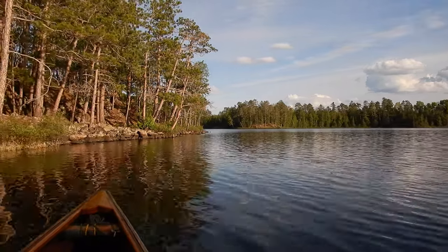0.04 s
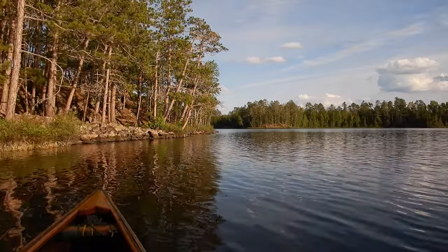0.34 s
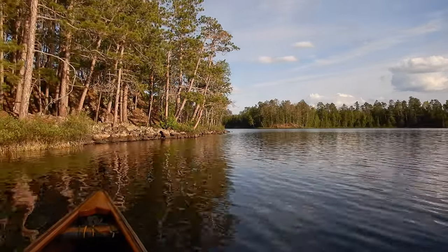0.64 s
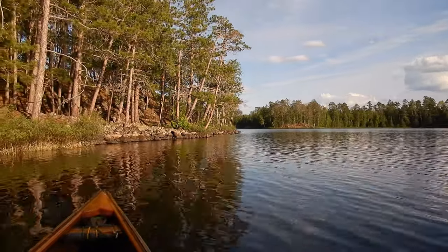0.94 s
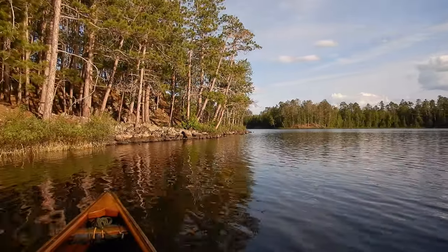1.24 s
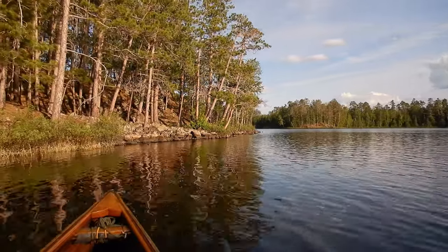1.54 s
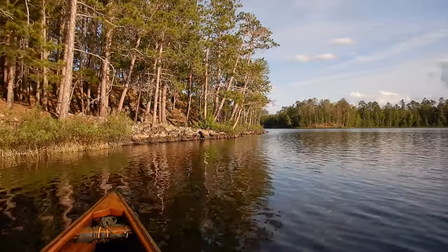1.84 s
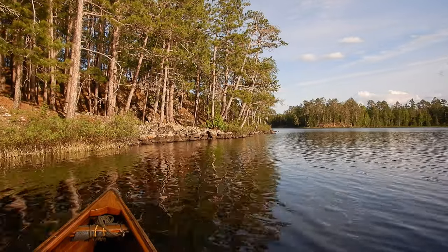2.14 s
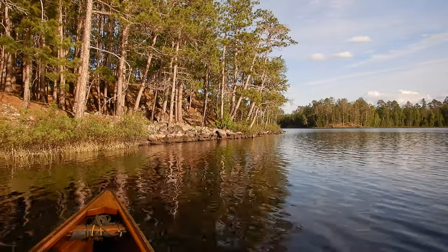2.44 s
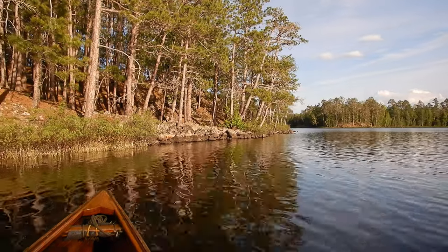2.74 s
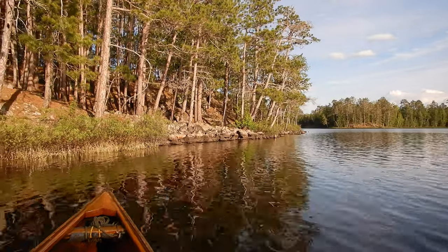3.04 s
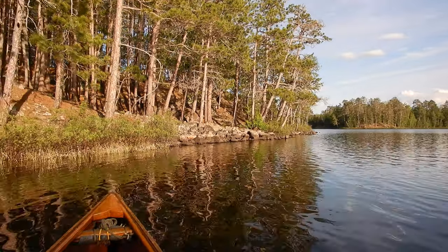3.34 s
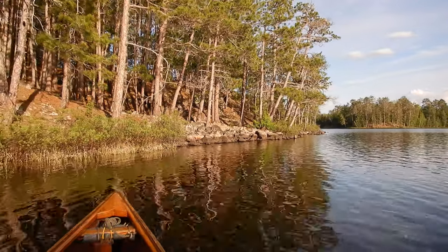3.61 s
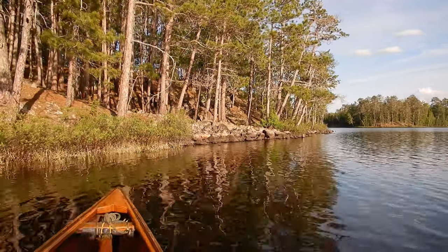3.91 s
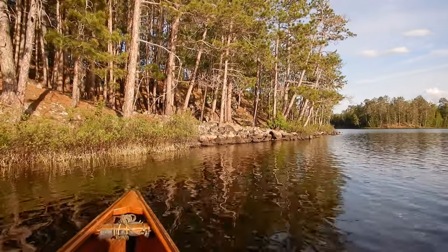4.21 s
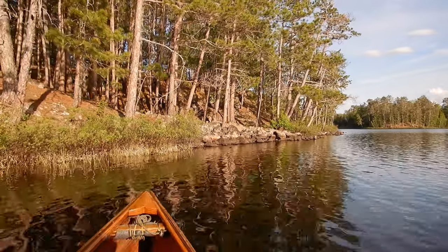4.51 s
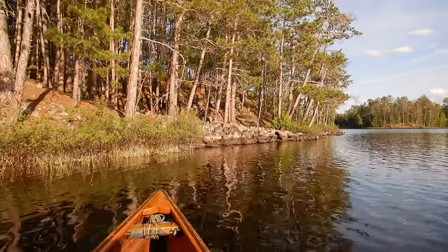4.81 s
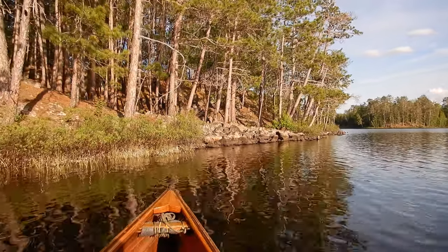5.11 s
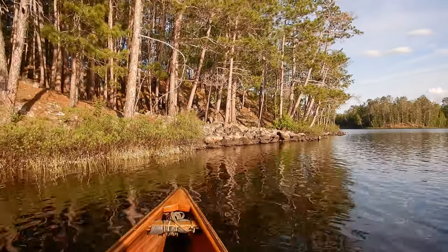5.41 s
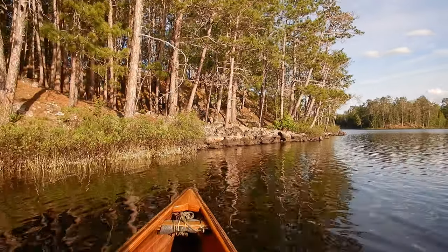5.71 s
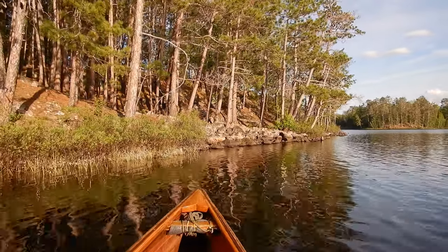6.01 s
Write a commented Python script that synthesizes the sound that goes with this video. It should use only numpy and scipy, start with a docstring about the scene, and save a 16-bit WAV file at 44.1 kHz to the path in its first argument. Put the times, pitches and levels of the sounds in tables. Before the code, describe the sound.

Gentle paddling on a quiet lake: bright plops, pattering drops and a low rubbing knock against the canoe, over a soft breeze.

```python
"""Bright plops and a patter of drops: a paddle dips beside a canoe gliding over a calm lake.
Each plop is a pocket of air ringing under the surface; drops tick and spray hisses off the blade.
On the pull the shaft sticks and slips along the hull, a dull judder that booms in the boat,
and eddies of tiny bubbles gurgle behind. A far bird whistles, light puffs buffet the microphone
and air moves softly in the shore pines."""
import sys
import numpy as np
from scipy import signal
from scipy.fft import rfft, irfft, next_fast_len
from scipy.io import wavfile
from scipy.ndimage import uniform_filter1d, map_coordinates

SR = 44100
rng = np.random.default_rng(int(sys.argv[2]) if len(sys.argv) > 2 else 0)


def generate_wav(signal):
    """Clip the signal to [-1, 1] and save it as 16-bit WAV at the path in sys.argv[1]."""
    frames = np.transpose(np.atleast_2d(signal))
    scaled = np.clip(frames, -1, 1) * 32767
    pcm = np.round(scaled).astype(np.int16)
    wavfile.write(sys.argv[1], SR, pcm)


N = 276066

# Levels in the tables are set ahead of each layer's own gain.
# drops and wavelets that smack the surface: start_s, pitch_hz, level_db, decay_cycles
SMACKS = [(0.0267, 1800, -28.5, 1.8), (.27, 2250, -31.5, 2.2), (1.0818, 2570, -23, 1.1),
          (1.1098, 960, -18, 0.38), (1.129, 1800, -34, 1), (1.151, 3080, -39, 3.6), (1.605, 1480, -39, 2.1),
          (1.988, 2000, -32.5, 1.6), (2.093, 1600, -19, 1.9), (2.096, 2850, -16.5, 3),
          (2.102, 1820, -16, 1.4), (2.11, 1910, -18, 1.3), (2.113, 1226, -14.5, 0.56),
          (2.151, 3060, -31, 2.4), (2.169, 1204, -22, 0.9), (2.1748, 2500, -10, 1.2),
          (3.869, 697, -34, 1.5), (3.885, 654, -26.5, 3.2), (3.9483, 728, -23, 1.9),
          (5.3959, 1890, -33.5, 1.3), (5.6677, 1610, -30.5, 1.8)]
# air pockets ringing under water: start_s, pitch_hz, level_db, swell_s, decay_s, glide (+ up, - down)
BUBBLES = [(.027, 565, -41, 0.0022, 0.0072, -1), (0.587, 1365, -44.5, 0.01, 0.0056, -1.5),
           (1.0814, 1560, -25.5, 0.00067, 0.003, 22.5), (1.0883, 915, -17.5, 0.0044, 0.0038, 6),
           (1.109, 415, -30.5, 0.0019, 0.008, -5.5), (2.0118, 1156, -19.5, 0.0018, 0.0011, 2.5),
           (2.017, 1650, -29, 0.0014, .004, -1.5), (2.029, 3050, -42.5, .003, .002, 3),
           (2.102, 934, -29.5, 0.0016, 0.0057, 9.5), (2.115, 610, -27, 0.0027, 0.0047, 4),
           (2.157, 1510, -26.5, 0.0037, 0.0019, 3), (2.175, 2190, -28, 0.0017, 0.0044, 6),
           (2.177, 996, -34, .002, 0.0043, -1), (2.183, 543, -34.5, 0.0033, 0.01, 13.5),
           (3.487, 266, -35.5, 0.0025, 0.014, 1.5), (3.63, 860, -41.5, 0.003, 0.0051, 10),
           (3.767, 1610, -38.5, 0.0041, 0.0039, 4), (3.865, 398, -30.5, 0.0026, 0.0095, 0),
           (3.879, 314, -25.5, 0.0034, .009, 1.5), (3.952, 805, -36.5, 0.0022, 0.0054, 6),
           (3.951, 414, -30.5, .002, 0.0054, -3), (4.388, 1313, -38.5, 0.0041, 0.0096, 7),
           (5.049, 662, -41, 0.002, 0.0104, 4), (5.513, 3060, -39.5, 0.0013, 0.004, -2),
           (5.541, 2657, -37, 0.009, 0.0039, -1.5), (5.576, 1430, -37.5, 0.0037, .003, 7),
           (5.585, 4240, -44.5, 0.0057, 0.0034, 2), (5.593, 1500, -37, 0.0013, 0.0024, 15),
           (5.604, 1175, -35.5, 0.0017, 0.0059, 23.5), (5.642, 1200, -42.5, 0.0026, 0.011, 6.5),
           (5.666, 1154, -33, 0.0018, 0.0023, 6), (5.676, 1620, -29, 0.0013, 0.0049, 3.5),
           (5.777, 466, -34.5, 0.0014, 0.018, 3), (5.822, 460, -38, 0.0046, 0.044, 4),
           (5.877, 1124, -16.5, 0.001, 0.0054, 6), (5.886, 1154, -24, 0.0021, 0.003, -1),
           (5.899, 1165, -30.5, 0.0016, .016, -1), (5.896, 540, -30, 0.0028, .0058, -11.5),
           (5.908, 950, -38, 0.0032, 0.0042, -5), (5.919, 502, -32.5, 0.0031, 0.0075, 1),
           (5.97, 1107, -42, .003, 0.0066, 0.5), (6.187, 1310, -37, 0.0034, 0.0062, 1.5)]
# pockets that race to the surface: start_s, length_s, first_hz, last_hz, level_db
CHIRPS = [(0.295, 0.021, 1130, 2000, -45.5), (1.249, 0.0091, 1400, 2010, -40.5),
          (2.4092, 0.0087, 1270, 1880, -33.5), (4.222, .026, 458, 753, -41.5),
          (4.246, 0.019, 923, 1615, -35.5), (4.6, 0.011, 1495, 2820, -42.5)]
# water folding over the blade or lapping at the hull: crest_s, centre_hz, level_db, decay_s
SLOSHES = [(.032, 810, -49, 0.0091), (1.113, 467, -52.5, 0.018), (1.12, 2280, -49.5, 0.048),
           (1.25, 1650, -48, 0.011), (2.017, 1480, -40, .016), (3.632, 1410, -49, 0.025),
           (3.74, 1300, -54.5, .04), (3.872, 1220, -51, 0.045), (3.882, 506, -42, .018),
           (3.955, 590, -47, 0.014), (4.254, 1370, -46.5, 0.011), (4.403, 1200, -52.5, 0.01),
           (5.58, 1370, -49.5, .01), (5.606, 1410, -47.5, 0.01), (5.668, 1380, -47.5, 0.019),
           (5.71, 2800, -56, 0.014), (5.886, 626, -36.5, 0.041), (5.975, 677, -47, 0.03)]
# drops falling from the blade: start_s, pitch_hz, level_db
DRIPS = [(1.111, 5300, -48), (1.1153, 4200, -35), (1.1505, 3300, -43), (1.165, 5400, -45),
         (1.175, 3600, -44), (1.1913, 5400, -47), (1.4828, 4540, -42.5), (1.521, 5700, -49),
         (1.528, 5450, -45), (1.5404, 4890, -43), (1.578, 5000, -49), (1.623, 4400, -39.5),
         (1.627, 3600, -46), (1.667, 5200, -50), (1.7134, 3870, -48.5), (1.7379, 4560, -36.5),
         (1.7641, 5660, -44), (1.7761, 4720, -47), (1.787, 5500, -46), (1.8243, 4300, -44),
         (1.832, 3100, -46.5), (1.8475, 3730, -37.5), (1.8507, 5400, -32), (1.8788, 3950, -41),
         (1.9183, 5040, -39), (1.9347, 3800, -37), (1.9395, 2760, -38), (1.968, 2380, -39),
         (1.989, 4200, -46), (1.995, 5250, -46), (2.0111, 5440, -37.5), (2.015, 4800, -44),
         (2.0448, 5130, -40.5), (2.156, 4760, -47), (2.235, 4860, -52)]
# tone of a drop's tick: freq_hz, gain_db
TICK_EQ = [(1000, -25), (3000, -7), (5400, 5.5), (7000, -7), (10000, -25), (14000, -25.5)]
# the shaft knocking along the hull: start_s, level_db
KNOCKS = [(3.617, -23.5), (3.647, -26), (3.677, -25.5), (3.705, -27.5), (3.7359, -24.5), (3.7652, -19.5),
          (3.7933, -24), (3.822, -25.5), (3.849, -30.5), (3.875, -34), (3.916, -31)]
# the hull's low modes: pitch_hz, level_db, t60_s
HULL_MODES = [(78.2, -11, 0.68), (136.6, 0, 0.069), (162, 5.5, 0.082), (195, 0, 0.056), (233, -9.5, 0.07),
              (306, -11.5, 0.068)]
# swell of the water shoved along the hull: time_s, level_db
WASH_FADER = [(3.6, -60), (3.625, -34.5), (3.7, -40.5), (3.89, -36), (4.03, -42.5), (4.3, -54), (4.6, -74)]
# tone of that surge: freq_hz, gain_db
SURGE_EQ = [(18, -37), (30, -13), (58, -10.5), (77, 0.5), (102, -11.5), (174, -2.5), (484, -23.5),
            (840, -33), (1240, -46.5), (1650, -33), (1860, -54), (3970, -52.5), (5160, -62.5), (8730, -120)]
# spurts of spray off the blade or a breaking wavelet: crest_s, level_db, decay_s
SPURTS = [(.497, -65.5, 0.012), (.545, -67, 0.059), (.6, -64.5, 0.016), (1.07, -58, 0.014),
          (1.119, -52, 0.02), (1.165, -57.5, 0.038), (1.26, -64, 0.062), (1.53, -66, 0.05),
          (1.625, -68.5, 0.22), (1.772, -62, 0.033), (1.853, -58.5, 0.02), (1.88, -61, 0.02),
          (1.936, -60.5, 0.03), (1.99, -60, 0.0093), (2.013, -57, 0.0054), (2.177, -51.5, 0.0041),
          (2.9, -62.5, 0.017), (3.2, -67, 0.011), (3.63, -73, 0.0089), (3.885, -75, 0.022),
          (3.955, -67.5, 0.035), (5.59, -62, 0.0054), (5.66, -73, 0.047), (5.882, -67.5, 0.0071),
          (5.938, -69.5, 0.02), (6.2, -71, 0.16)]
# tone of the spray: freq_hz, gain_db
SPRAY_EQ = [(300, -29), (1500, -3), (3000, 0), (5500, 6), (7000, -19), (10000, -17), (15000, -31)]
# left-right likeness of the spray's hiss: freq_hz, correlation
HISS_LIKENESS = [(2000, 0.91), (5000, 0.0028)]
# the gurgle that trails the boat: time_s, level_db
WAKE_FADER = [(0, -67), (.9, -65.5), (3.6, -66.5), (4.4, -60), (5.4, -65.5), (5.65, -68), (6.26, -57.5)]
# tone of the wake, its finest bubbles the faintest: freq_hz, gain_db
GURGLE_EQ = [(400, -0.5), (1500, 0), (2400, -3), (3000, 1), (3600, -12)]
# the bird's slurred whistles and buzzy closing notes:
# start_s, length_s, first_hz, middle_hz, last_hz, level_db, waver_share (of the pitch)
WHISTLES = [(0.592, 0.051, 2860, 3000, 3050, -59, .03), (0.648, 0.11, 4120, 3990, 3600, -66, 0.029),
            (0.781, 0.02, 2900, 2600, 2520, -59, 0.013), (0.828, 0.046, 2360, 3000, 2450, -58, 0.0083),
            (2.386, .25, 3860, 3950, 4120, -77.5, .006), (2.578, 0.19, 4110, 4190, 4230, -69.5, .007),
            (2.768, 0.086, 4260, 4290, 4240, -71, .04), (2.89, 0.19, 3080, 3120, 3120, -71, .04)]
# puffs of breeze on the microphone: time_s, level_db
BREEZE_FADER = [(0, -49), (.6, -61), (.84, -51), (1, -58), (1.6, -56), (3, -56), (3.7, -47), (4.5, -48),
                (5.2, -45.5), (5.6, -58), (6.26, -43.5)]
# tone of their rumble: freq_hz, gain_db
BUFFET_EQ = [(12, -9.5), (30, -0.5), (75, -0.5), (130, -8), (300, -29.5), (900, -100)]
# tone of the background hush: freq_hz, gain_db
AIR_EQ = [(20, -10), (70, -5.5), (130, -3), (170, -5.5), (245, -1.5), (370, -10.5), (700, -15),
          (1400, -20.5), (2900, -27), (3800, -37.5), (5600, -41.5), (6800, -61.5), (10000, -56.5),
          (15500, -66)]
# left-right likeness of the hush: freq_hz, correlation
AIR_LIKENESS = [(60, 0.071), (120, 0.27), (230, 0.47), (460, 0.35), (910, 0.45), (1790, 0.36), (3520, 0.32)]
# balance of the hush: freq_hz, left_over_right_db
AIR_PAN = [(60, 0), (140, -2.5), (310, -4), (690, 1.5), (1560, -0.5), (3520, 1)]
# diffuse ring of the open hull: freq_hz, t60_s
HULL_REVERB = [(300, 0.16), (1500, 0.074), (6000, 0.035)]
# how far to the right the water is stirred: time_s, right_share
PADDLE_SIDE = [(2.2, 0.85), (3.6, .3)]
# balance of a sound at the right-hand side: freq_hz, left_over_right_db
SIDE_PAN = [(500, -0.5), (1100, -3), (1700, -8), (2600, -13), (4000, -23.5), (5400, -14)]
# phase of that sound at the two microphone ports: freq_hz, left_lead_rad
SIDE_PHASE = [(260, 0.6), (1000, -0.2), (1900, 0.5), (3000, -1.3), (4200, 2), (5100, 2.5), (7500, 2.5)]
# tone of the microphone: freq_hz, gain_db
MIC_EQ = [(5800, 2.5), (7500, 5.5), (12000, -7.5)]

SLOSH_SWELL_S, SPURT_RISE_S = 0.016, 0.013


def plops():
    """Smacks, bubbles, chirps and sloshes beside the boat; the bright ones sit further to the right."""
    smacks = [(s, hz, db, smack(hz, cycles)) for s, hz, db, cycles in SMACKS]
    bubbles = [(s, hz, db, plop(hz, swell_s, decay_s, glide, splash_db=-14.5, linger_s=0.0019, shed_db=-23))
               for s, hz, db, swell_s, decay_s, glide in BUBBLES]
    chirps = [(s, first_hz, db, chirp(length_s, first_hz, last_hz))
              for s, length_s, first_hz, last_hz, db in CHIRPS]
    sloshes = [(s - SLOSH_SWELL_S, hz, db + 3, slosh(hz, decay_s)) for s, hz, db, decay_s in SLOSHES]
    track = np.zeros((2, N))
    for start_s, hz, db, sound in smacks + bubbles + chirps + sloshes:
        pan_db = curve(SIDE_PAN, hz) * np.interp(start_s, *np.transpose(PADDLE_SIDE))
        add(track, start_s, hull_reverb(amp(db - 4) * sound * pan(pan_db), wet_db=-9.5, width=0.45))
    return from_the_side(track)


def smack(hz, cycles):
    """A drop hits the surface with a tick and traps a ringing pocket; big, low drops sound duller."""
    decay_s = cycles / hz
    sound = plop(hz, 0.27 * decay_s, decay_s, glide=3.7, splash_db=-20.5, linger_s=0.0032, shed_db=-25.5)
    t = np.arange(len(sound)) / SR
    tick_band = signal.butter(2, [1.6 * hz, 1.66 * hz], "band", fs=SR, output="sos")
    tick = signal.sosfilt(tick_band, rng.standard_normal(len(t)))
    sound += amp(-12.5) * unit_rms(tick) * np.exp(-t / 0.00078)
    lowpass = signal.butter(3, min(3.3 * hz, SR / 3), fs=SR, output="sos")
    return signal.sosfilt(lowpass, sound)


def plop(hz, swell_s, decay_s, glide, splash_db, linger_s, shed_db):
    """An air pocket rings amid the splash of the water closing over it, and sheds smaller bubbles."""
    t = np.arange(SR // 8) / SR
    freqs = np.fft.rfftfreq(2 * len(t), 1 / SR)
    sound = bubble(t, hz, swell_s, decay_s, glide)
    # the splash is a band of noise round the bubble's pitch, and outlasts it
    band = 1 / (1 + (4.1 * (freqs / hz - hz / (freqs + 1))) ** 2)
    splash = unit_rms(irfft(rfft(rng.standard_normal(2 * len(t))) * band))[:len(t)]
    sound += amp(splash_db) * splash * (1 - np.exp(-(t / swell_s) ** 2)) * np.exp(-t / (decay_s + linger_s))
    breakup_s = 3 * decay_s + 0.004  # a long gulp breaks up more slowly than a sharp drip
    for late, pitch in rng.random((5, 2)):
        shed_hz = hz * 2 ** (0.15 + 0.9 * pitch)
        shed = bubble(t, shed_hz, swell_s=0.000087, decay_s=3 / shed_hz, glide=7.8)
        add(sound, late * breakup_s, amp(shed_db - 19 * late) * shed)
    return sound


def bubble(t, hz, swell_s, decay_s, glide):
    """One air pocket rings; its pitch rises as it nears the surface and falls if it is driven under."""
    envelope = (1 - np.exp(-(t / swell_s) ** 2)) * np.exp(-t / decay_s)
    pitch_hz = hz * 2 ** (glide * 0.048 * (1 - np.exp(-t / 0.031)))
    # a fast-moving pocket is deformed by the flow, so its pitch flutters
    flutter = np.interp(t, np.linspace(0, t[-1], 100), rng.standard_normal(100))
    depth = 0.024 + 0.0028 * abs(glide)
    return envelope / envelope.max() * tone(pitch_hz * (1 + depth * flutter))


def chirp(length_s, first_hz, last_hz):
    """A pocket's pitch climbs ever faster until it bursts at the surface."""
    progress = np.linspace(0, 1, round(length_s * SR))
    pitch_hz = first_hz * (last_hz / first_hz) ** (progress ** 1.5)
    arch = 4 * progress * (1 - progress)
    return arch ** 0.55 * tone(pitch_hz)


def slosh(centre_hz, decay_s, spread_octaves=0.796, decay_cycles=2.6):
    """Folding water: a dense cluster of short-lived bubbles swells and dies away."""
    t = np.arange(SR // 9) / SR
    when, pitch, size = rng.random((3, 64, 1))
    hz = centre_hz * 2 ** (spread_octaves * (2 * pitch - 1))
    cycles = np.maximum(t - when * t[-1], 0) * hz
    rings = np.sin(2 * np.pi * cycles) * np.exp(-cycles / decay_cycles) * (1 - np.exp(-cycles))
    froth = unit_rms(np.sum(amp(5.1 * size) * rings, axis=0))
    swell = np.minimum(t / SLOSH_SWELL_S, 1) ** 2
    return froth * swell * np.exp(-np.maximum(t - SLOSH_SWELL_S, 0) / decay_s)


def patter(tick_decay_s=0.0011, rebound_s=0.0081):
    """Drops from the blade tick on the lake, ring, and throw up smaller drops that land just after."""
    ticks, rings = np.zeros((2, N))
    t = np.arange(SR // 80) / SR
    for start_s, hz, db in DRIPS:
        add(rings, start_s, amp(db) * bubble(t, hz, swell_s=0.00057, decay_s=5.7 / hz, glide=5))
        for late in [0, *rng.random(size=3)]:
            tick = rng.standard_normal(len(t)) * np.exp(-t / tick_decay_s)
            add(ticks, start_s + late * rebound_s, amp(db - 12 * late) * tick)
    drops = amp(-3) * equalise(ticks, TICK_EQ) + amp(-4) * rings
    return from_the_side(hull_reverb(drops * pan(-8.5), wet_db=-14.5, width=0.28)[:, :N])


def pull(knock_swell_s=0.0058):
    """The shaft sticks and slips: soft knocks ring the hull's low modes over a surge of shoved water."""
    judder = np.zeros(N)
    t = np.arange(SR // 2) / SR
    for start_s, db in KNOCKS:
        boom = sum(amp(mode_db + rng.normal(0, 2.7) - 60 * t / t60_s) * np.sin(2 * np.pi * hz * t)
                   for hz, mode_db, t60_s in HULL_MODES)
        boom *= 1 - np.exp(-t / knock_swell_s)
        add(judder, start_s, amp(db) * boom / np.abs(boom).max())
    surge = noise_bed(SURGE_EQ, likeness=[(50, 0.38), (200, 0.89), (3000, 0.97)], patchy_db=1)
    return judder * pan(1.2) + amp(-1.5) * fader(WASH_FADER) * surge


def spray():
    """A thin sheet of water hisses; only a strong flow breaks into droplets and finer, brighter beads."""
    flow = amp(-75.5) + bursts(SPURTS, SPURT_RISE_S) + amp(-69) * stirring(settle_s=0.044, db_scale=0.82)
    breaking = flow / (flow + amp(-60.5))
    drops = bubble_cloud(count=2500, centre_hz=4430, spread_octaves=0.87, decay_cycles=2.9,
                         rise_share=0.043, size_db=11.5, pan_db=-7.5, pan_spread_db=-3.5)
    drops = unit_rms(equalise(hull_reverb(drops, wet_db=-4.5, width=0.16), SPRAY_EQ))
    beads = bubble_cloud(count=3000, centre_hz=8040, spread_octaves=0.67, decay_cycles=3.5,
                         rise_share=0.02, size_db=20, pan_db=-6, pan_spread_db=3)
    hiss = noise_bed(SPRAY_EQ, HISS_LIKENESS, patchy_db=3.5)
    sheet = amp(3.7 * wobble(90)) * hiss * pan(-0.5)
    broken = flow * (breaking * amp(8) * from_the_side(drops) + breaking ** 2 * amp(-4) * beads)
    return broken + (amp(-0.5) * flow + amp(-38) * fader(WASH_FADER)) * sheet


def wake():
    """Small bubbles gurgle round the boat, louder where the water is stirred, shoved or sprayed."""
    gurgle = bubble_cloud(count=3000, centre_hz=1193, spread_octaves=1.572, decay_cycles=3.55,
                          rise_share=0.088, size_db=25.5, pan_db=-2.5, pan_spread_db=3)
    unrest = fader(WAKE_FADER) + amp(-40.5) * stirring(settle_s=0.029, db_scale=0.56)
    unrest += amp(-27) * fader(WASH_FADER) + amp(-9) * bursts(SPURTS, SPURT_RISE_S)
    return unrest * hull_reverb(equalise(gurgle, GURGLE_EQ), wet_db=-8, width=0.95)[:, :N]


def bubble_cloud(count, centre_hz, spread_octaves, decay_cycles, rise_share, size_db, pan_db, pan_spread_db):
    """Tiny bubbles ring at random times, each rising a little in pitch; stereo, rms 1."""
    when, pitch, size, place = rng.random((count, 4)).T
    hz = centre_hz * 2 ** (spread_octaves * (2 * pitch - 1))[:, None]
    samples = np.arange(SR // 40)
    age = hz * samples / SR / decay_cycles  # in decay times
    cycles = decay_cycles * (age + rise_share * (age - 1 + np.exp(-age)))
    rings = np.sin(2 * np.pi * cycles) * np.exp(-age) * (1 - np.exp(-age * decay_cycles))
    rings *= amp(size_db * size ** 2)[:, None]
    slots = ((when * N).astype(int)[:, None] + samples).ravel()
    gains = pan(pan_db + pan_spread_db * (2 * place - 1))
    channels = [np.bincount(slots, (rings * gain[:, None]).ravel(), N)[:N] for gain in gains]
    return unit_rms(np.array(channels))


def stirring(settle_s, db_scale):
    """Unrest of the water, as a gain: it follows every smack and bubble and settles again."""
    return bursts([(s, db_scale * db, settle_s) for s, _, db, *_ in SMACKS + BUBBLES], rise_s=0.0089)


def hull_reverb(sound, wet_db, width):
    """A sound plus its short, diffuse ring between hull and water."""
    hz, t, noise = signal.stft(rng.standard_normal((3, SR // 6)), SR, nperseg=256)
    tails = signal.istft(noise * amp(-60 * t / curve(HULL_REVERB, hz)[:, None]), SR, nperseg=256)[1]
    tails = tails[0] + width * tails[1:]
    tails *= amp(wet_db) / np.linalg.norm(tails[0])
    tails[:, 0] = 1  # the direct path
    return signal.fftconvolve(sound, tails, axes=1)


def from_the_side(sound):
    """Sounds from beside the boat reach the two microphone ports out of step."""
    share = np.interp(np.arange(N) / SR, *np.transpose(PADDLE_SIDE))
    shifted = filtered(sound, lambda hz: np.exp(np.array([[0.5j], [-0.5j]]) * curve(SIDE_PHASE, hz)))
    return (1 - share) * sound + share * shifted


def bird(woods_t60_s=0.5):
    """Thin wavering whistles, each an arch of pitch and loudness, blurred by the trees of the shore."""
    song = np.zeros(N)
    t = np.arange(N) / SR
    flutter = wobble(140)
    for start_s, length_s, first_hz, middle_hz, last_hz, db, waver in WHISTLES:
        progress = np.clip((t - start_s) / length_s, 0, 1)
        arch = 1 - (2 * progress - 1) ** 2
        bend_hz = middle_hz - (first_hz + last_hz) / 2
        pitch_hz = first_hz + (last_hz - first_hz) * progress + bend_hz * arch
        song += amp(db) * np.sqrt(arch) * tone(pitch_hz * (1 + waver * flutter))
    song *= amp(1.8 * wobble(33.97))
    woods = rng.standard_normal((2, SR // 2)) * amp(-60 * t[:SR // 2] / woods_t60_s)
    echo = signal.fftconvolve(song[None], woods / np.linalg.norm(woods[0]), axes=1)[:, :N]
    return amp(-1) * song + amp(2) * echo


def breeze():
    """Light puffs of air buffet the microphone, more on the open left port."""
    puffs = amp(4.3 * wobble(9)) * noise_bed(BUFFET_EQ, likeness=[(60, 0.065)], patchy_db=2.5)
    return amp(-6.5) * fader(BREEZE_FADER) * puffs * pan(7.4)


def air():
    """The steady hush of breeze, pines and ripples."""
    hush = noise_bed(AIR_EQ, AIR_LIKENESS, patchy_db=2)
    hush = filtered(hush, lambda hz: pan(curve(AIR_PAN, hz)))
    return amp(-50.5 + 0.61 * wobble(2.19) + 1.04 * wobble(25)) * unit_rms(hush)


def noise_bed(eq, likeness, patchy_db):
    """Stereo noise of rms 1, with random louder and softer patches in time and frequency."""
    def mid_side_gains(hz):
        angle = np.arccos(np.clip(curve(likeness, hz), -1, 1)) / 2
        return amp(curve(eq, hz)) * [np.cos(angle), np.sin(angle)]

    spectra = signal.stft(rng.standard_normal((2, N)), nperseg=512)[2]
    patches = uniform_filter1d(rng.standard_normal(spectra.shape[1:]), size=5, axis=0)
    patches = uniform_filter1d(patches, size=10, axis=1)
    noise = signal.istft(spectra * amp(patchy_db * unit_rms(patches)), nperseg=512)[1][:, :N]
    mid, side = filtered(noise, mid_side_gains)
    return unit_rms(np.array([mid + side, mid - side]))


def bursts(events, rise_s):
    """Gain per sample: each (crest_s, level_db, decay_s) event swells and dies; the strongest wins."""
    t = np.arange(N) / SR
    coarse = t[::16]
    log_gains = [np.log(amp(db)) - np.maximum((crest_s - coarse) / rise_s, (coarse - crest_s) / decay_s)
                 for crest_s, db, decay_s in events]
    return np.exp(np.interp(t, coarse, np.max(log_gains, axis=0)))


def fader(points):
    """Gain per sample from (time_s, level_db) points, silent outside them."""
    return amp(np.interp(np.arange(N) / SR, *np.transpose(points), left=-120, right=-120))


def wobble(rate_hz):
    """A smooth random curve with rate_hz knots a second."""
    knots = rng.standard_normal(int(N * rate_hz / SR) + 4)
    return map_coordinates(knots, [np.arange(N) * rate_hz / SR])


def curve(points, hz):
    """Read (freq_hz, value) points along a log frequency axis."""
    freqs, values = np.transpose(points)
    return np.interp(np.log(hz + 1), np.log(freqs + 1), values)


def filtered(sound, response):
    """Shape a sound by a function of frequency."""
    size = next_fast_len(N + SR // 2)
    return irfft(rfft(sound, size) * response(np.fft.rfftfreq(size, 1 / SR)), size)[..., :N]


def equalise(sound, eq):
    return filtered(sound, lambda hz: amp(curve(eq, hz)))


def tone(pitch_hz):
    return np.sin(2 * np.pi * np.cumsum(pitch_hz) / SR)


def pan(left_over_right_db):
    return amp(np.array([[0.5], [-0.5]]) * left_over_right_db)


def amp(db):
    return 10 ** (np.asarray(db) / 20)


def unit_rms(sound):
    return sound / np.sqrt(np.mean(sound ** 2) + 1e-20)


def add(track, start_s, sound):
    """Mix a sound into a track in place."""
    part = track[..., max(round(start_s * SR), 0):][..., :sound.shape[-1]]
    part += sound[..., :part.shape[-1]]


def scene():
    """Paddle and water up front; bird, breeze and pines behind."""
    return plops() + patter() + pull() + spray() + wake() + bird() + breeze() + air()


def record(dry, band_limit_hz=15600):
    """The microphone adds presence, dulls the top treble and keeps nothing above its band limit."""
    return filtered(dry, lambda hz: amp(curve(MIC_EQ, hz)) * (hz < band_limit_hz))


dry = scene()
out = record(dry)
generate_wav(out)
```